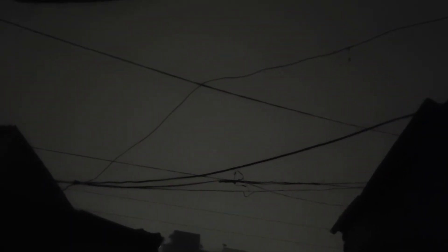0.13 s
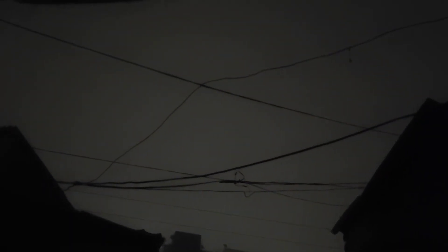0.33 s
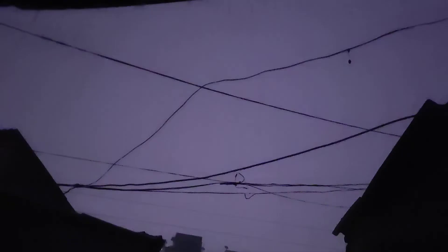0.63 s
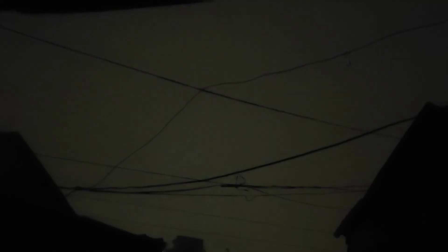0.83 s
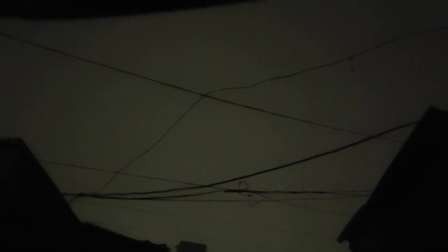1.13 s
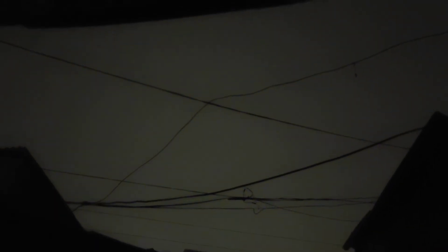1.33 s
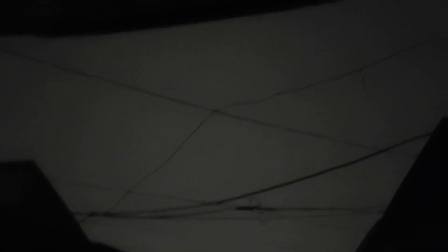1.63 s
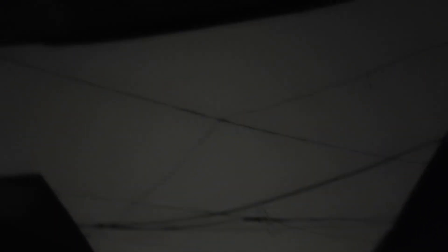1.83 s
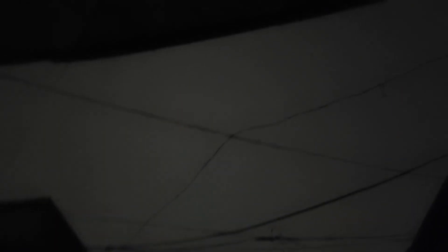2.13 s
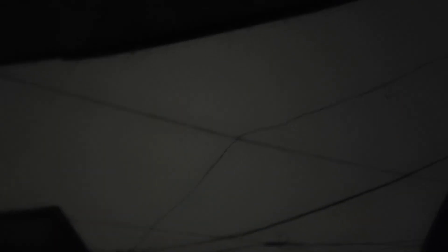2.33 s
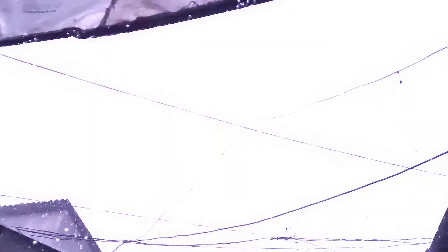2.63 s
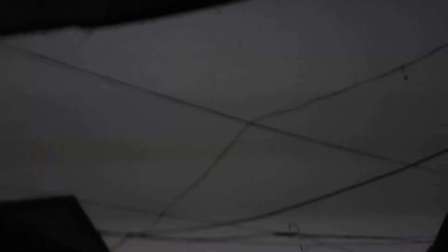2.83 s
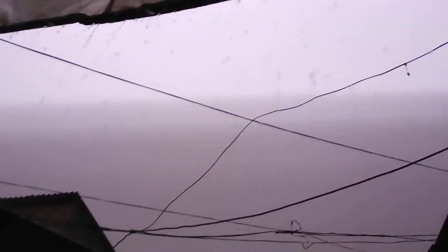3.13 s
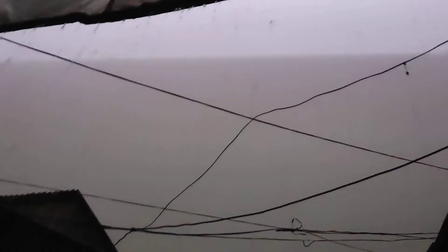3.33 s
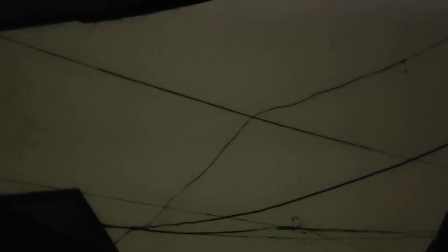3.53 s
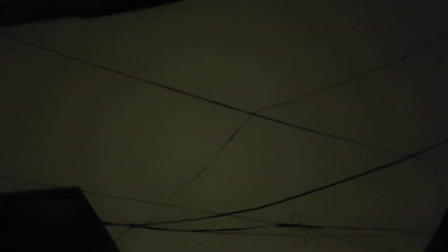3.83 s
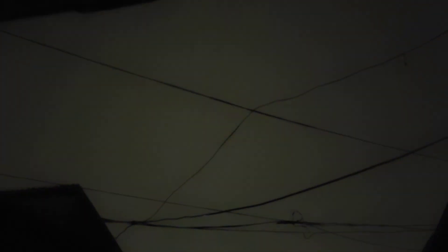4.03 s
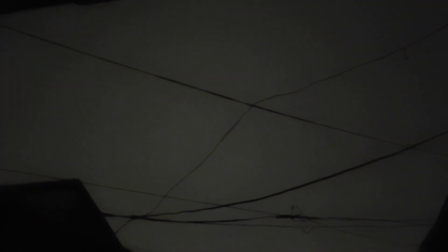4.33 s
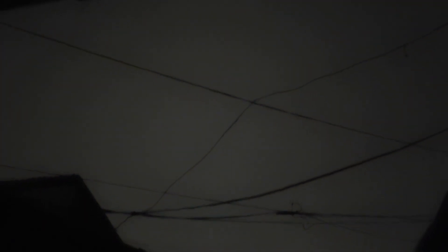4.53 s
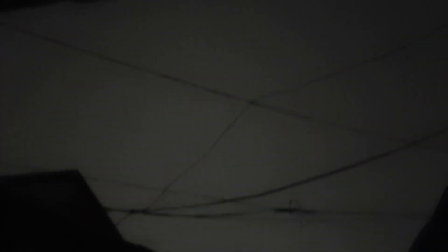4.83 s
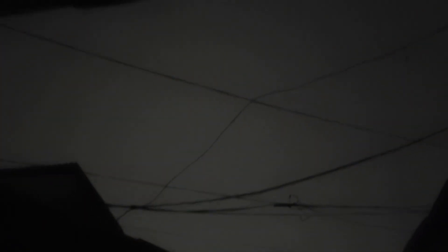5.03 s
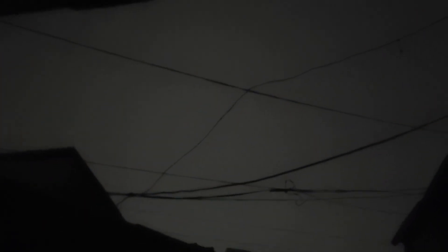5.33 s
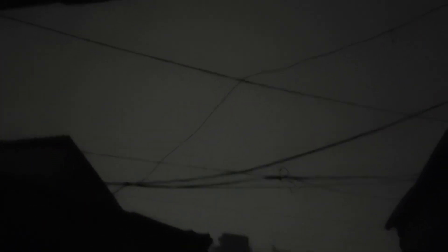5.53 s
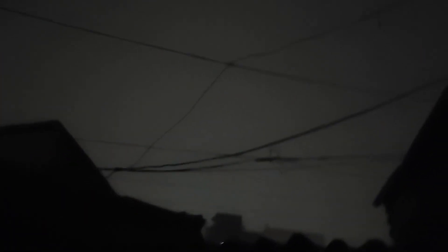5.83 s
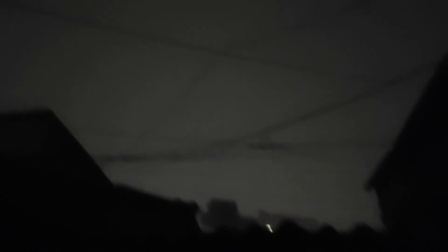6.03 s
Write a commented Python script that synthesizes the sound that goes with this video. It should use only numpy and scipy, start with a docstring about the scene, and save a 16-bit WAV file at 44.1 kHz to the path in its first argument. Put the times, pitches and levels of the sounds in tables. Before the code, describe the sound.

A downpour fills the outdoor space from all sides, crisp and hissing, with irregular watery splatters and a few big drops smacking nearby. Low distant thunder rumbles softly beneath, with several gentle peals midway. In the last second, closer thunder rolls in quickly, its heavy low claps overlapping between the houses while the rain carries on.

```python
"""Among rooftops at night, under an eave: heavy rain on two microphones a hand's length apart.
Far thunder mutters as ringing noise; a nearer roll with claps booms between the houses.
Countless coloured clicks make the far wash; ringing clicks in short showers make splashes of run-off.
Single big drops smack close by as short slaps. The right microphone's port colours the rain."""
import sys
import numpy as np
from scipy import signal
from scipy.fft import rfft, irfft
from scipy.io import wavfile
from scipy.ndimage import uniform_filter1d

SR = 44100
rng = np.random.default_rng(int(sys.argv[2]) if len(sys.argv) > 2 else 0)


def store_wav(level_fs):
    """Save 16-bit WAV to argv[1]."""
    pcm = np.round(np.clip(np.atleast_2d(level_fs), -1, 1) * 32767)
    wavfile.write(sys.argv[1], SR, pcm.T.astype(np.int16))


N = 273420
TIME = np.arange(N) / SR
COARSE_TIME = np.linspace(0, N / SR, 4096)  # for slow envelopes
FULL_HZ = np.fft.rfftfreq(N, 1 / SR)

# Peals of far thunder: start_s, level_db (before rise and fade), fade_s
PEALS = [(.7, -38, .25), (2.94, -40, 0.52), (3.29, -35, 0.94), (3.72, -37.5, 0.89), (4.49, -35.5, 0.31),
         (5.06, -44, 0.27)]
# Claps from the bends of the near bolt: start_s, deep_boom_db, body_db, time_to_peak_s
CLAPS = [(5.183, -48, -30, 0.032), (5.425, -41, -27.5, 0.018), (5.515, -26.5, -22, 0.042),
         (5.64, -19, -30.5, 0.033), (5.724, -17.5, -25, 0.048), (5.87, -34, -27, 0.044),
         (5.95, -23, -47, 0.087), (6.16, -24.5, -28, 0.032)]
# Resonances of the far mutter between the houses: pitch_hz, width_hz, relative_level_db
MUTTER_MODES = [(97, 41, 2), (165, 60, 0), (214, 86, 0), (346, 195, -3)]
# Resonances of the near thunder's deep boom: pitch_hz, width_hz, relative_level_db
BOOM_MODES = [(100, 18, 0), (76, 14, -12.5)]
# Resonances of the near thunder's body: pitch_hz, width_hz, relative_level_db
BODY_MODES = [(166, 38, 0), (228, 50, -4.5), (286, 40, -12), (380, 170, -15.5)]
# Resonance of the deepest rumble: pitch_hz, width_hz, relative_level_db
RUMBLE_MODES = [(35, 34, 0)]
# Spectrum of far rain on wet ground: frequency_hz, relative_level_db (per Hz)
RAIN_SPECTRUM = [(100, -8.5), (350.0, -8), (700.0, -6.5), (1300.0, -7), (1800.0, -6), (2300.0, -2),
                 (2800.0, -1), (4000.0, -3.5), (5200.0, -2.5), (7500.0, -3), (8700.0, -1), (10300.0, -10),
                 (12000.0, -5.5), (14000, -8.5)]
# Brief lulls in the rain: centre_s, depth_db
LULLS = [(.5, 1.5), (1.43, 1.5), (1.93, 2)]
# Ringing droplets, higher the smaller they are: pitch_hz, width_hz, relative_level_db
DROPLETS = [(2347, 810, -2), (2910, 830, 0), (4080, 1340, -2.5), (5390, 2100, 0.5), (7450, 2400, 2),
            (12200, 3600, 3)]
# Biggest gobs of run-off bursting on the ground: peak_s, level_db (before the droplet share), length_s
SPLASHES = [(.704, -14.5, 0.025), (.892, -20, .04), (1.015, -21, 0.055), (1.307, -15, 0.046),
            (1.6, -13, 0.026), (2.34, -24, 0.018), (2.797, -15.5, 0.016), (3.409, -24, .03),
            (3.477, -16, 0.047), (3.55, -16.5, 0.055), (3.89, -17.5, 0.045), (4.101, -18.5, 0.044),
            (4.636, -20, .055), (5.888, -14, .03), (5.97, -14.5, 0.04)]
# Biggest drops close by: time_s, click_level_db (before the slap's colour)
SMACKS = [(0.7017, -2), (1.5314, 5), (1.6314, -7), (1.8934, 5), (2.3372, 2), (2.5304, 4), (3.456, 2),
          (3.8904, 0), (4.804, 0)]
# Colour of the right microphone's port: pitch_hz, width_hz, gain_held_level_db, gain_tilted_up_db
PORT = [(4080, 650, 2.5, 10), (6920, 630, 10.5, 5.5), (8620, 460, -1.5, -5), (9800, 700, 7, .5),
        (11700, 910, -0.5, -3)]
# Turn of the microphones toward the sky: time_s, tilt (0 level to 1 up)
TILT = [(0, 0.33), (1.4, 0.34), (2.1, 0.67), (3, 0.92), (4.4, 1), (6.2, 0.88)]

# far thunder: a constant mutter under the peals
MUTTER_DB, PEAL_RISE_S = -42, 0.044
# the near roll comes in quickly and keeps growing
ROLL_START_S, ROLL_RISE_S, ROLL_DB, ROLL_GROWTH_DB_PER_S = 5.17, 0.041, -31.5, 4
# the deepest rumble never stops; it heaves slowly and grows with the thunder
RUMBLE_DB, RUMBLE_HEAVE_DB, RUMBLE_SHARE_DB = -45, 0.5, -9
# starting level of the far wash, base level of the near patter, and the slow easing of both
WASH_DB, PATTER_DB, EASING_DB_PER_S, LULL_S = -21.5, -34, 0.2255, 0.05
TILT_PATTER_DB = 0.83  # rise of the patter from level to fully tilted up
# lesser gobs fall by chance; their level varies evenly by up to the spread either way
GOBS_PER_S, GOB_DB, GOB_SPREAD_DB, GOB_S = 9, -20.5, 1.0, 0.014
# all gobs scatter around one pitch
GOB_HZ, GOB_SPREAD_OCTAVES = 3430, 0.31
GOB_SHARE_DB = -11  # of a gob's sound, for each size of droplet
FINE_EVENNESS = 0.25  # exponent: fine spray falls more evenly than large droplets
MIC_LAG = 26  # samples that sound takes from one microphone to the other
EDGE_HZ = 14300  # upper limit of the recorder's band


def gain_of(db):
    """Decibels to amplitude."""
    return 10 ** (np.asarray(db) / 20)


def power_of(db):
    """Decibels to power."""
    return gain_of(db) ** 2


def evened(x):
    """Scales to rms 1."""
    return x / np.sqrt(np.mean(x ** 2) + 1e-20)


def curve(rows, t=TIME):
    """Reads a time table."""
    return np.interp(t, *np.transpose(rows))


def read(points, hz):
    """Reads a spectrum on a log-frequency axis."""
    f, value = np.transpose(points)
    return np.interp(np.log(hz + 1), np.log(f + 1), value)


def drift(rate_hz):
    """Slow chance of rms 1, up to about rate_hz changes a second."""
    hz = np.fft.rfftfreq(len(COARSE_TIME), COARSE_TIME[1])
    noise = rfft(rng.standard_normal(len(COARSE_TIME)))
    slow = irfft(noise / (1 + (hz / rate_hz) ** 4))
    return np.interp(TIME, COARSE_TIME, evened(slow))


def resonance(hz, f, width):
    """Steep-sided response of a damped ring at f."""
    return 1 / (1 + 1j * (hz ** 2 - f ** 2) / (1.47 * width * hz + 1)) ** 2


def far_peals():
    """Power of the far thunder: each peal rises quickly and fades into the mutter."""
    power = power_of(MUTTER_DB)
    for start, db, fade in PEALS:
        age = np.maximum(TIME - start, 0)
        level = gain_of(db) * np.minimum(age / PEAL_RISE_S, 1) * np.exp(-age / fade)
        power = power + level ** 2
    return power


def near_roll():
    """Power of the near thunder's roll, rising quickly and then growing."""
    age = np.maximum(TIME - ROLL_START_S, 0)
    rise = np.minimum(age / ROLL_RISE_S, 1)
    return (rise * gain_of(ROLL_DB + ROLL_GROWTH_DB_PER_S * age)) ** 2


def roll(modes, steady_s):
    """A crowd of scattered pressure waves rings the resonances; its strength is held even over steady_s."""
    power_gain = sum(power_of(db) / width * abs(resonance(FULL_HZ, f, width)) ** 3
                     for f, width, db in modes)
    common, apart = rfft(rng.standard_normal((2, N))) * np.sqrt(power_gain)
    # the microphones differ more as the waves get shorter
    side = apart * np.minimum((FULL_HZ / 620) ** 1.4, 1)
    x = irfft(np.array([common + side, common - side]), N)
    power = abs(signal.hilbert(x.mean(0))) ** 2 / 2
    steady = uniform_filter1d(power, max(int(steady_s * SR), 1))
    return x / np.sqrt(steady + 1e-20)


def thunder(roll_boom_db=-4):
    """Far thunder mutters on; each bend of the near bolt sends a clap that swells and dies over the roll."""
    far, body = far_peals(), near_roll()
    boom = body * power_of(roll_boom_db)
    # the rumble follows the far thunder and the roll, not the claps
    heave = RUMBLE_HEAVE_DB * drift(rate_hz=2.8)
    deep = power_of(RUMBLE_DB + heave) + (far + body) * power_of(RUMBLE_SHARE_DB)
    for start, boom_db, body_db, swell in CLAPS:
        age = np.maximum(TIME - start, 0) / swell
        surge = age ** 2 * np.exp(1 - age ** 2)
        boom = boom + power_of(boom_db) * surge
        body = body + power_of(body_db) * surge
    near = roll(BOOM_MODES, steady_s=.045) * np.sqrt(boom)
    near = near + roll(BODY_MODES, steady_s=.05) * np.sqrt(body)
    mutter = roll(MUTTER_MODES, steady_s=0.106) * np.sqrt(far)
    rumble = roll(RUMBLE_MODES, steady_s=.25) * np.sqrt(deep)
    return near + mutter + rumble


def downpour():
    """How hard it rains, in dB: a slow easing and a few lulls."""
    lulls = sum(depth * np.exp(-((TIME - s) / LULL_S) ** 2) for s, depth in LULLS)
    return -EASING_DB_PER_S * TIME - lulls


def drops(per_s, spread_db):
    """Clicks of uneven size from all round: each reaches the right microphone early or late."""
    chance, weight, bearing = rng.random((3, N))
    at = np.flatnonzero(chance < per_s / SR)
    sign = np.where(rng.random(N)[at] < .5, -1, 1)
    # many small drops, few big ones, with a ceiling
    size = sign * gain_of(spread_db * np.minimum(-np.log1p(-weight[at]), 4))
    lag = np.round(MIC_LAG * (2 * bearing[at] - 1)).astype(int)
    arrival = (at + lag) % N
    return evened(np.array([np.bincount(at, size, N), np.bincount(arrival, size, N)]))


def colour(x, spectrum):
    """Gives clicks a spectrum, causally, keeping the power of white input."""
    hz = abs(np.fft.fftfreq(4096, 1 / SR))
    gain = evened(gain_of(read(spectrum, hz)))
    # minimum phase puts the energy right after each click
    response = np.exp(np.conj(signal.hilbert(np.log(gain))))
    taps = np.fft.ifft(response).real[:1024]
    return signal.oaconvolve(x, taps[None], axes=1)[:, :N]


def wash(flutter_db=0.57, swell_db=0.5):
    """Countless far drops on roofs and street."""
    level = WASH_DB + downpour() + flutter_db * drift(rate_hz=23) + swell_db * drift(rate_hz=7)
    return colour(drops(per_s=22000, spread_db=2), RAIN_SPECTRUM) * gain_of(level)


def run_off(count=120):
    """Time, level, length and pitch of every gob: the big ones, then an uneven stream of lesser ones."""
    delay, loudness, spread = rng.random((count, 3)).T
    lesser_s = (np.arange(count) + 2 * delay - 1) / GOBS_PER_S
    lesser_db = GOB_DB + GOB_SPREAD_DB * (2 * loudness - 1)
    lesser_length = GOB_S * (.5 + spread)
    lesser = np.transpose([lesser_s, lesser_db, lesser_length])
    s, db, length = np.vstack([SPLASHES, lesser]).T
    pitch = GOB_HZ * 2 ** (GOB_SPREAD_OCTAVES * rng.standard_normal(len(s)))
    return s, db, length, pitch


def splashes(clump_db=3.0, range_octaves=0.66, attack_share=0.46):
    """Run-off lands in gobs, each a short shower of droplets of like size, over an uneven patter."""
    out = np.zeros((2, N))
    s, db, length, centre = run_off()
    patter_db = PATTER_DB + downpour() + TILT_PATTER_DB * curve(TILT)
    age = COARSE_TIME[:, None] - s
    # a gob bursts quickly and its droplets fall back more slowly
    side_share = np.where(age < 0, attack_share, 1 - attack_share)
    bursts = np.exp(-(age / (length * side_share)) ** 2)
    for pitch, width, size_db in DROPLETS:
        likeness = np.exp(-(np.log2(pitch / centre) / range_octaves) ** 2)
        gob_power = bursts @ (likeness * power_of(db + GOB_SHARE_DB))
        gobs = np.interp(TIME, COARSE_TIME, gob_power)
        unevenness_db = clump_db * (GOB_HZ / pitch) ** FINE_EVENNESS
        patter = power_of(patter_db + unevenness_db * drift(rate_hz=34))
        clicks = drops(per_s=.22 * pitch, spread_db=2.0)  # the smaller the droplets, the more of them
        rings = irfft(rfft(clicks) * resonance(FULL_HZ, pitch, width), N)
        out += evened(rings) * gain_of(size_db) * np.sqrt(gobs + patter)
    return out


def smacks(small_db=-36):
    """Big drops slap a wet surface for a cycle or two; smaller ones fall between them."""
    clicks = gain_of(small_db) * drops(per_s=90, spread_db=0.8)
    lags = rng.integers(-MIC_LAG, MIC_LAG // 2, len(SMACKS))
    for (s, db), lag in zip(SMACKS, lags):
        at = round(s * SR)
        clicks[[0, 1], [at, at + lag]] += gain_of(db)
    # frequency_hz, relative_level_db
    slap = [(200, -17), (1200, -16), (2000, -13.0), (3000, -1.0), (4500, -2.5), (8000, -17), (14000, -15)]
    return colour(clicks, slap)


def right_port(x):
    """The right port lifts or dulls a few bands by amounts that follow the tilt."""
    hz, t, z = signal.stft(x[1], SR, nperseg=256, noverlap=192)
    tilt = curve(TILT, t)
    db = 0
    for f, width, level, up in PORT:
        band = np.exp(-.5 * ((hz[:, None] - f) / width) ** 2)
        db = db + band * (level + (up - level) * tilt)
    right = signal.istft(z * gain_of(db), SR, nperseg=256, noverlap=192)[1][:N]
    return np.array([x[0], right])


def scene():
    """Rain all round, thunder behind it."""
    rain = right_port(wash() + splashes() + smacks())
    return rain + thunder()


def record(dry):
    """The tallest peaks are rounded off softly, then the recorder's band ends."""
    rounded = dry / (1 + (dry / .8) ** 6) ** (1 / 6)
    low_pass = signal.firwin(701, EDGE_HZ, window=("kaiser", 9), fs=SR)
    return signal.oaconvolve(rounded, low_pass[None], "same")


dry = scene()
out = record(dry)
store_wav(out)
```